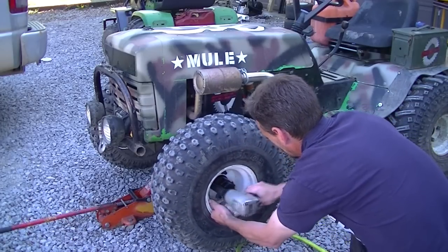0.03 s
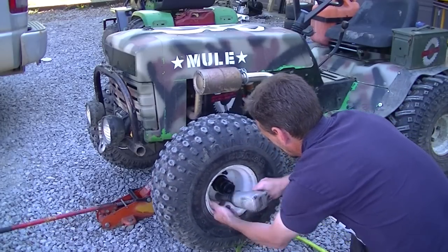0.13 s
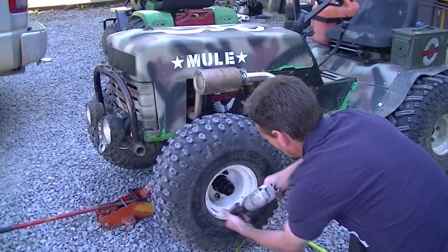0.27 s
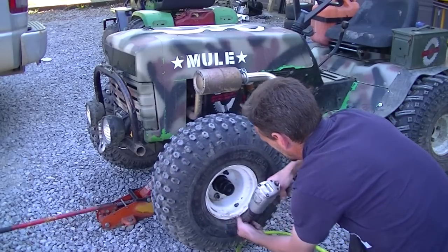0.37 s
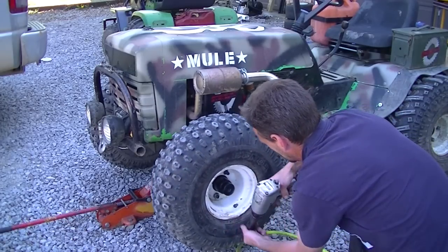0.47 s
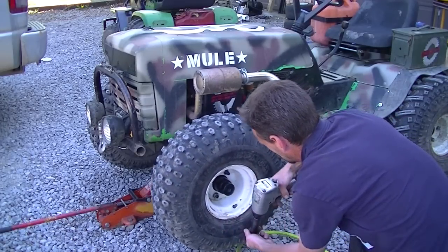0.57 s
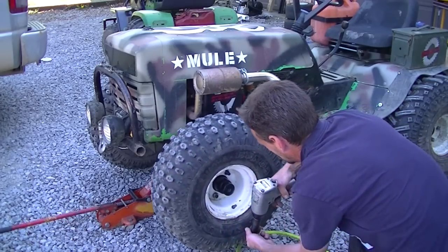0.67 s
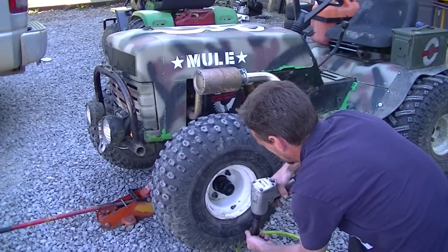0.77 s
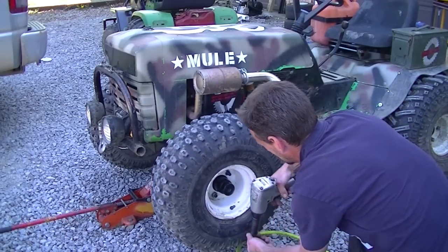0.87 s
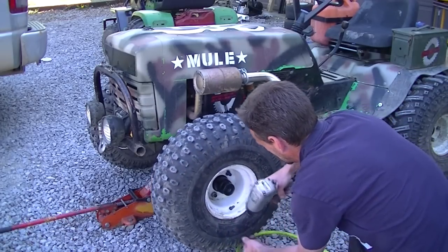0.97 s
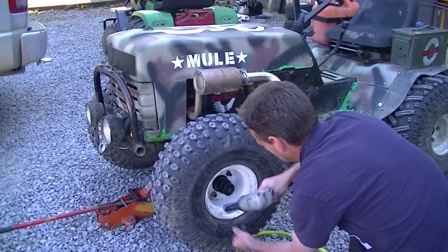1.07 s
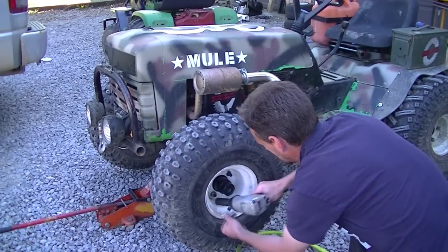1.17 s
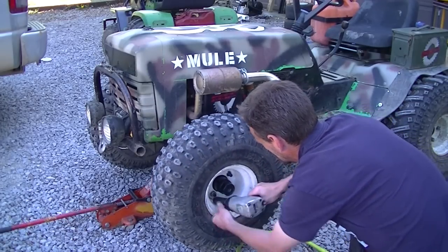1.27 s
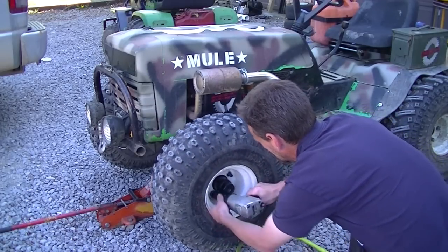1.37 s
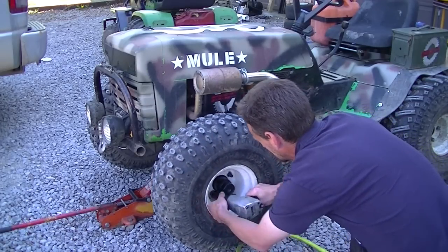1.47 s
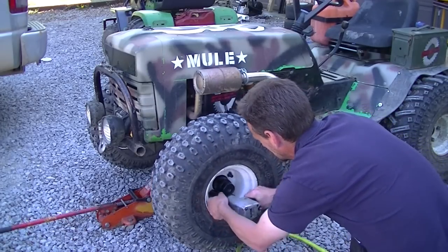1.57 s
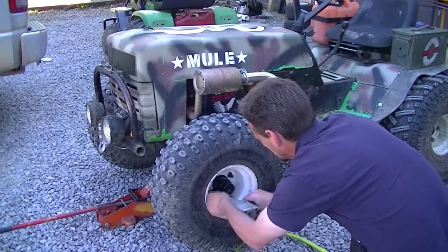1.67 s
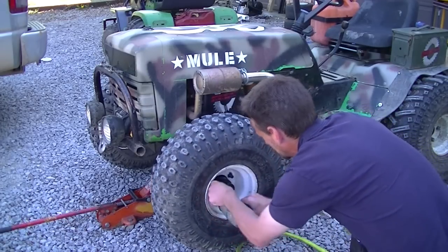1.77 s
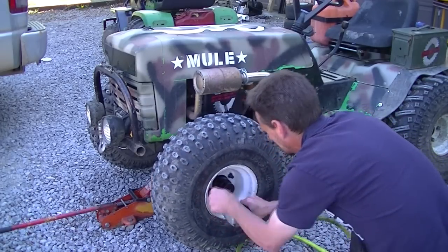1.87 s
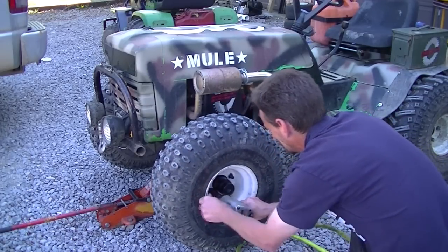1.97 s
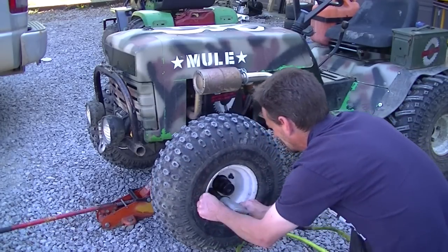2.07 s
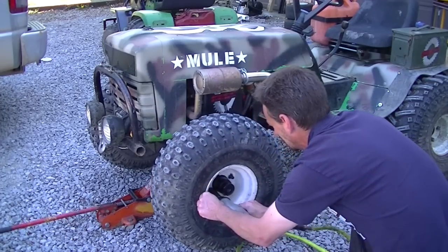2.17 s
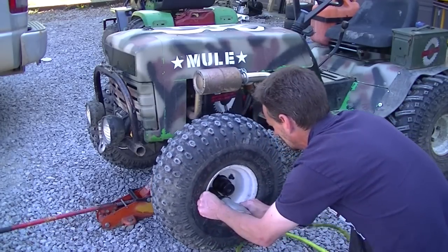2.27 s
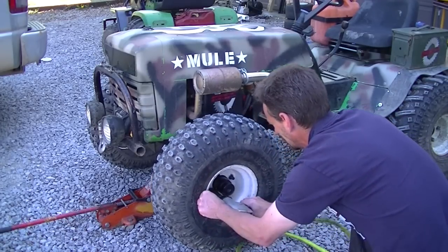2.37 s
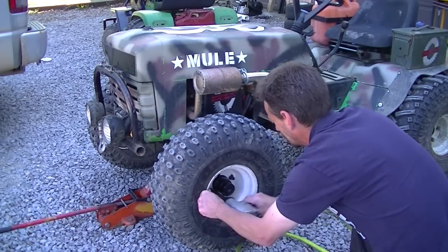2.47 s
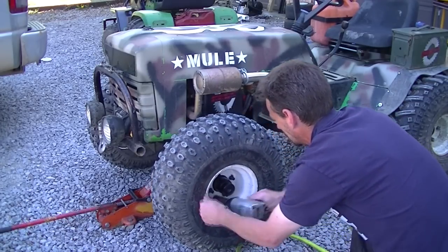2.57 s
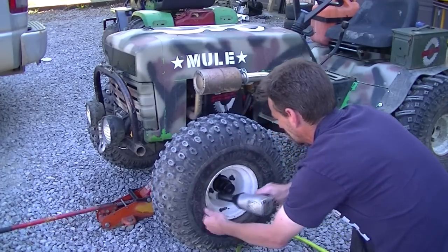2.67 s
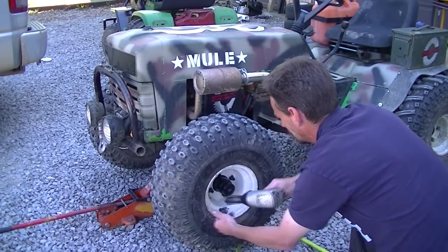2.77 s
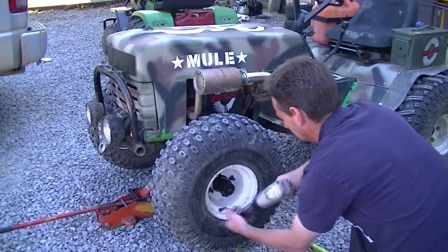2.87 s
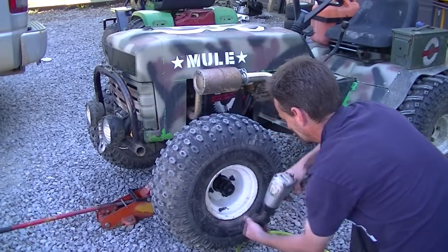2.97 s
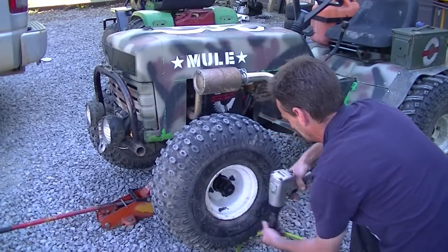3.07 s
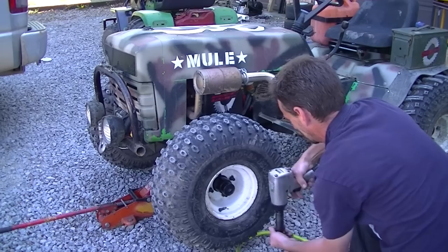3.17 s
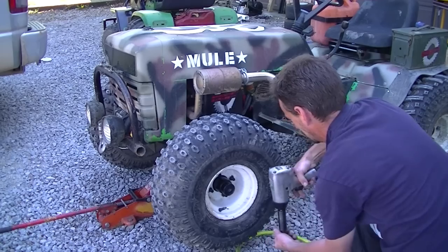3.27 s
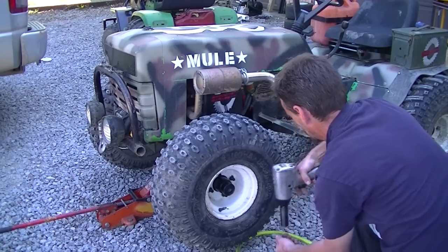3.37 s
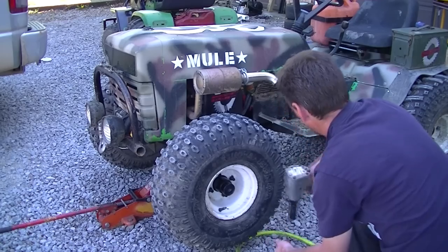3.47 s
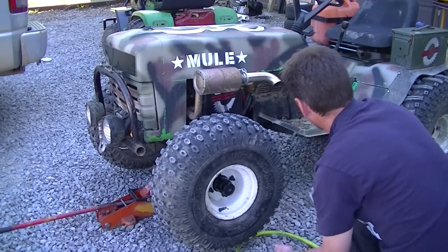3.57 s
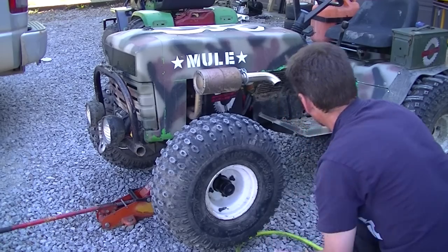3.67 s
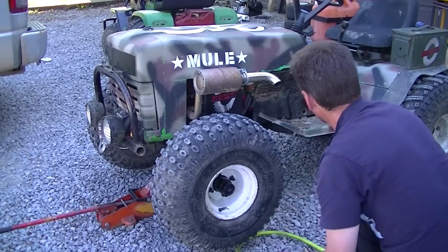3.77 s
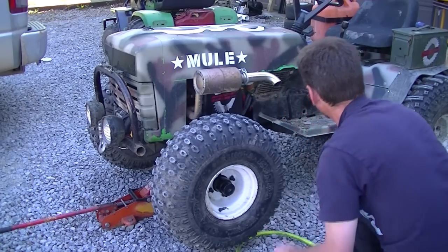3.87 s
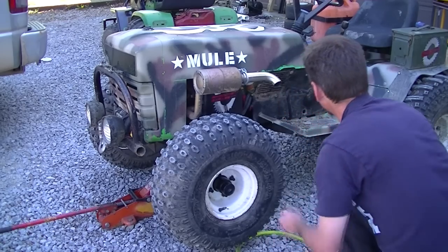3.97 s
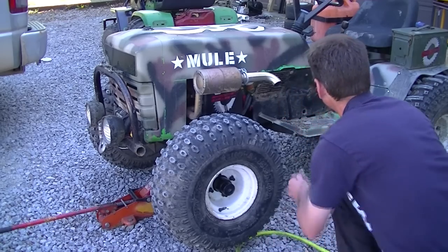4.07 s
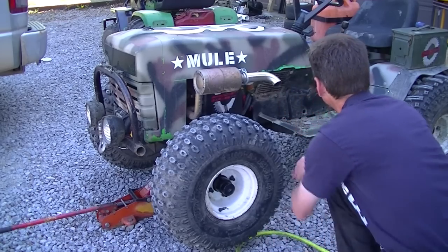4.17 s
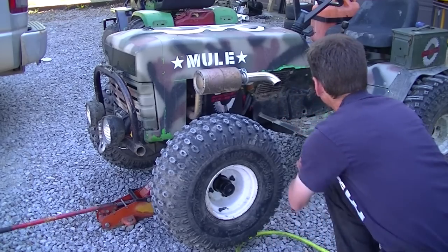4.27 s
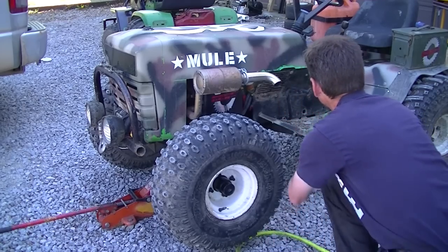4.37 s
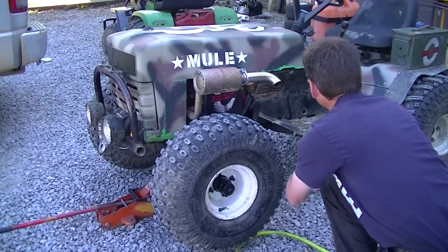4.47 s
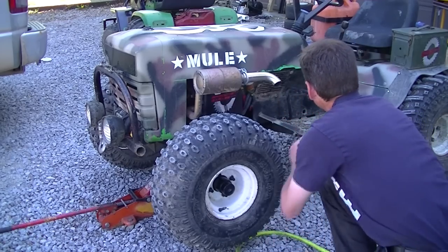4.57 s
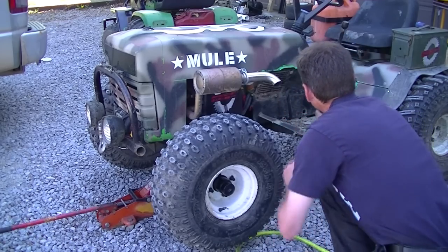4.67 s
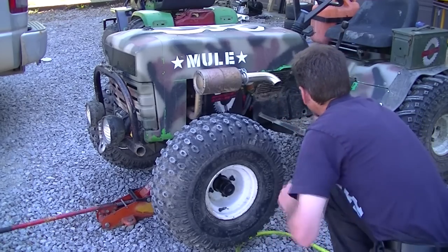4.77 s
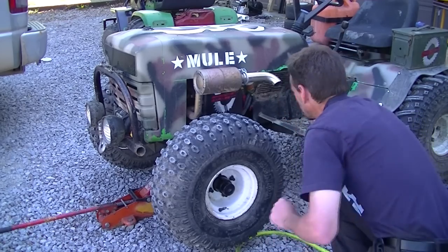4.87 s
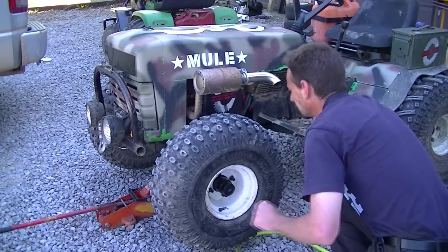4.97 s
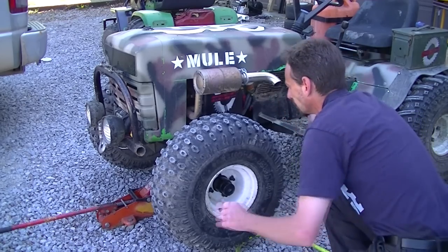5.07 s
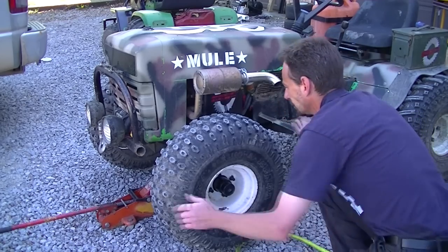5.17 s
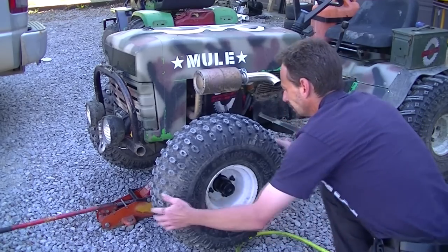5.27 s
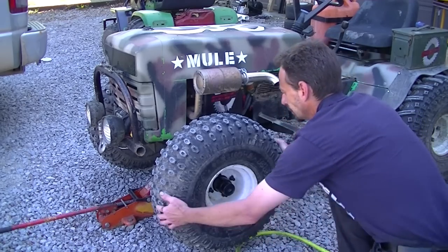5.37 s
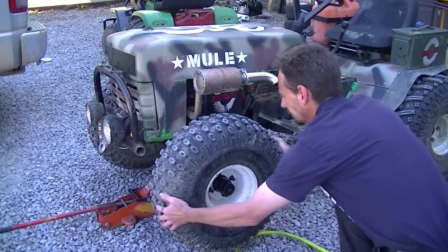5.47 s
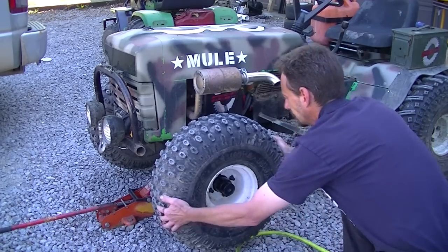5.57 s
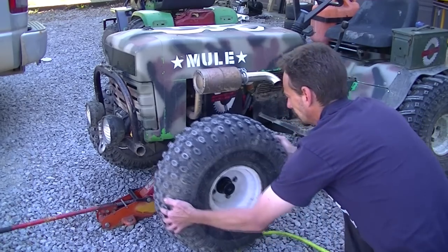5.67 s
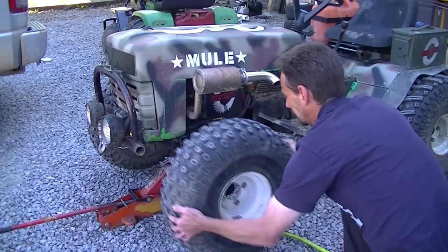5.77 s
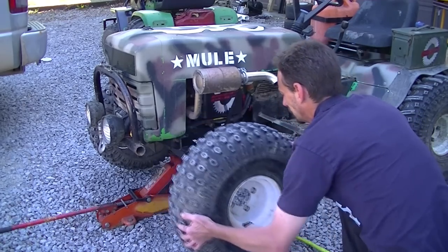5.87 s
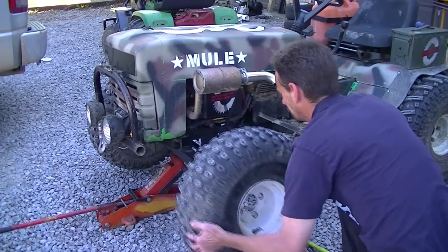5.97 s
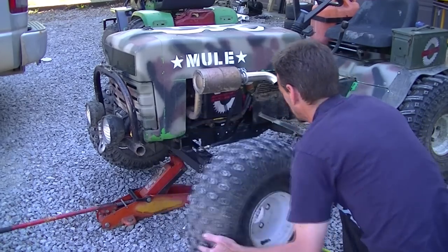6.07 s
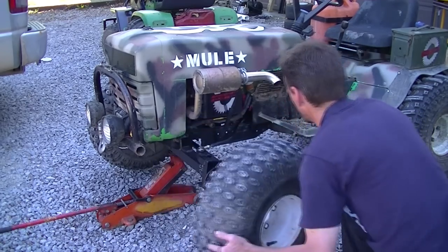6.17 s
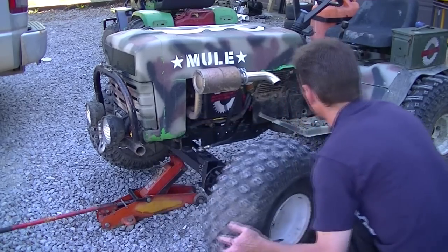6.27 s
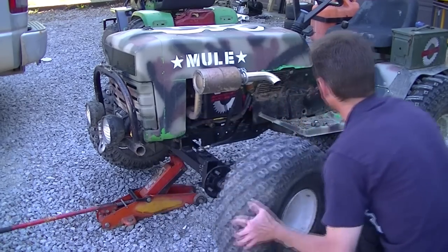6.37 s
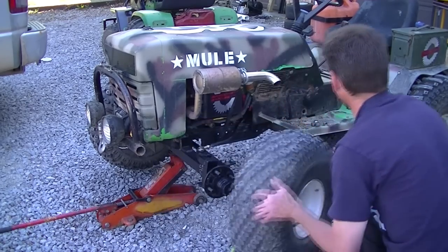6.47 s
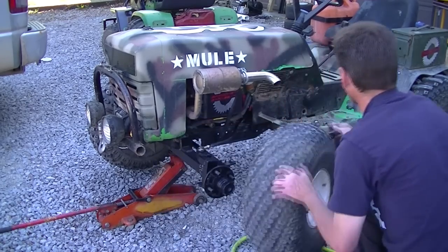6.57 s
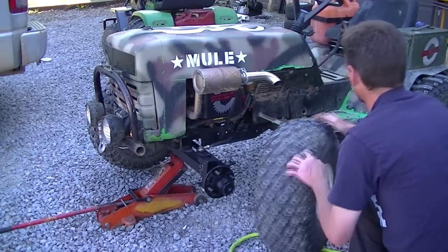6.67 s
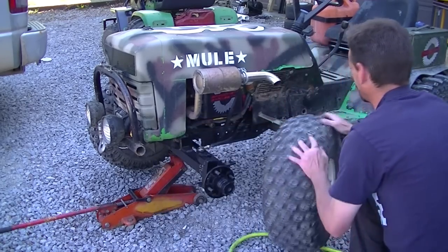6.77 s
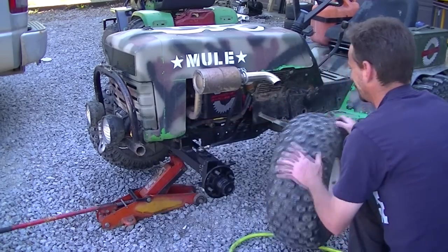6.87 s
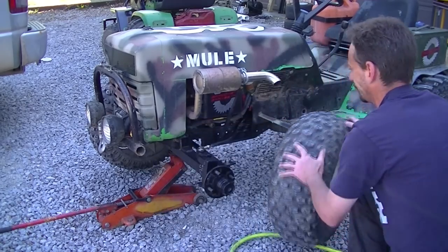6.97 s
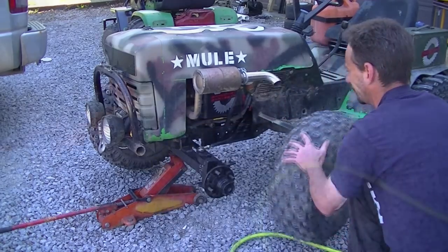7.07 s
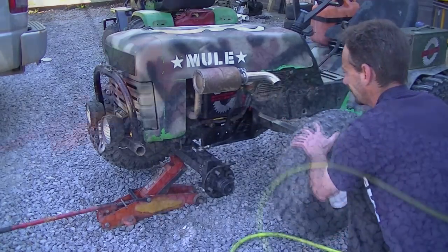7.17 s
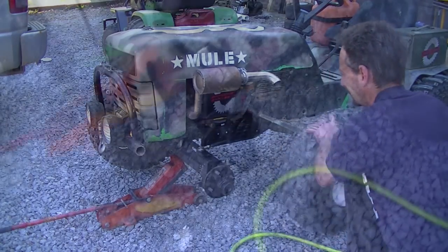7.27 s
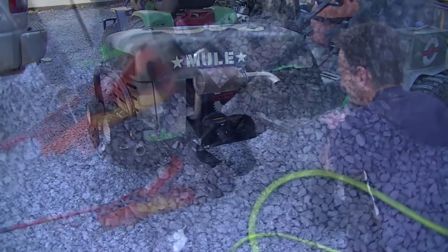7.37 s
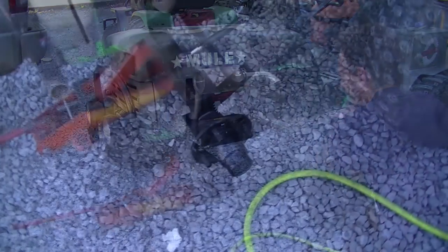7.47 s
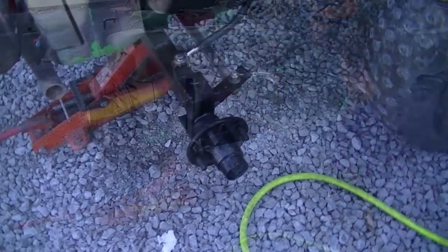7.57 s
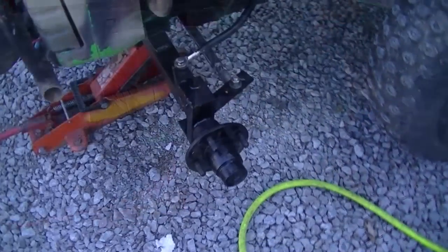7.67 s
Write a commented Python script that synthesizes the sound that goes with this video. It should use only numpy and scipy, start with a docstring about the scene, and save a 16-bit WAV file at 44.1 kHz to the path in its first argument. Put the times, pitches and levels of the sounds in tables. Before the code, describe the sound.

Close by in a gravel yard, an air wrench coasts down with a falling whine and metallic jingling while a bird whistles faintly. The socket knocks onto a nut, and the wrench hammers for half a second with a loud hiss, then rings and rattles as it slows. Knocks and crunching stones follow, a wheel scrapes off its studs, and the tyre thumps gently across the gravel. Light wind touches the microphone.

```python
"""An air impact wrench runs down, is fitted to a wheel nut, hammers briefly and runs down again.
Its vanes chop the air into pulses, its exhaust jet hisses and its blows ring the steel socket.
Tool and nuts knock on a gravel yard, the steel rim scrapes off the studs and the tyre rolls over
the stones. A bird whistles faintly; light wind touches the two microphone ports."""
import sys
import numpy as np
from scipy import signal
from scipy.io import wavfile
from scipy.ndimage import uniform_filter1d

SR = 44100
rng = np.random.default_rng(int(sys.argv[2]) if len(sys.argv) > 2 else 0)


def log_audio(samples):
    """Write samples as a 16-bit WAV file to the path given in sys.argv[1]."""
    # one column per channel
    frames = np.atleast_2d(samples).T
    # limit to full scale, then quantise
    limited = np.clip(frames, -1, 1)
    pcm = np.round(limited * 32767).astype(np.int16)
    wavfile.write(sys.argv[1], SR, pcm)


N = 340452
T = np.arange(N) / SR


def gain_of(db):
    """Decibels as an amplitude ratio."""
    return 10 ** (np.asarray(db) / 20)


def unit_rms(x):
    """Normalisation to unit mean power."""
    return x / np.sqrt(np.mean(x ** 2) + 1e-20)


def wander(samples, passes=1):
    """Slow random modulation: a moving average of white noise."""
    x = rng.standard_normal(N)
    for _ in range(passes):
        x = uniform_filter1d(x, samples)
    return unit_rms(x)


def level_at(spectrum, hz):
    """Interpolation of a spectrum, in dB, over log frequency."""
    points_hz, db = np.transpose(spectrum)
    return np.interp(np.log(hz + 1), np.log(points_hz + 1), db, -70, -70)


def coloured(x, spectrum):
    """Minimum-phase filter of unit noise gain, from rows of (frequency_hz, level_db)."""
    log_gain = np.log(gain_of(level_at(spectrum, abs(np.fft.fftfreq(8192, 1 / SR)))))
    taps = np.fft.ifft(np.exp(signal.hilbert(log_gain).conj())).real[:4096]
    return signal.oaconvolve(x, taps / np.linalg.norm(taps))[:N]


def resonate(x, modes):
    """Forced response of damped modes (pitch_hz, level_db, t60_s), at unit noise gain."""
    t = T[:round(SR * max(t60 for *_, t60 in modes))]
    taps = sum(gain_of(db - 60 * t / t60) * np.sin(2 * np.pi * hz * t) for hz, db, t60 in modes)
    return signal.oaconvolve(x, taps / np.linalg.norm(taps))[:N]


def bursts(start_s, level_db, t60_s):
    """Impact noise: fast attacks and exponential decays that add in power."""
    t, power = T[:SR // 3], np.zeros(N + SR)
    rise = 1 - np.exp(-t / .0004)
    for start, db, t60 in np.broadcast(start_s, level_db, t60_s):
        power[round(start * SR):][:len(t)] += (rise * gain_of(db - 60 * t / t60)) ** 2
    return np.sqrt(power[:N]) * rng.standard_normal(N)


def grains(per_s, spread_db):
    """Shot noise: sparse clicks of random sign, a few of them large."""
    size = gain_of(spread_db * np.minimum(rng.exponential(1, N), 4)) * rng.choice([-1, 1], N)
    return unit_rms(size * (rng.random(N) < per_s / SR))


def gate(start, end):
    """Trapezoidal envelope with 4 ms edges."""
    return np.clip(np.minimum(T - start, end - T) / .004, 0, 1)


def hump(start, length, rise_share):
    """Skewed half-sine envelope, peaking at rise_share of its length."""
    progress = np.clip((T - start) / length, 0, 1)
    skew = np.log(.5) / np.log(np.clip(rise_share, .05, .9))
    return abs(np.sin(np.pi * progress ** skew))


def rotor_speed(on, off, top_hz, air_drag, spin_up_s=.22, friction_per_s=1.4, push_s=.015):
    """Share of top speed: a first-order rise, then braking by bearing friction and quadratic drag."""
    driven_s, released_s = np.clip(T - on - .05, 1e-3, None), np.maximum(T - off, 0)
    rising = (1 - np.exp(-driven_s / spin_up_s)) / (1 - np.exp(-(off - on - .05) / spin_up_s))
    braked_s = released_s - push_s * (1 - np.exp(-released_s / push_s))  # trapped air pushes on
    drag_ratio = air_drag * top_hz / friction_per_s
    falling = 1 / ((1 + drag_ratio) * np.exp(friction_per_s * braked_s) - drag_ratio)
    return np.where(T < off, rising, falling)


# Exhaust response to the vane pulses: frequency_hz, level_db
EXHAUST_SPECTRUM = [(60, -24), (130, -18), (215, -9), (265, -20), (320, -28), (420, -20), (530, -14),
                    (660, -20), (800, -36), (1100, -19), (1500, -12), (1950, -26), (2550, -14), (3200, -30),
                    (6500, -45)]
def vane_pulses(on, off, vane_hz, cycles):
    """Siren principle: vanes chop the flow into harmonics of their passing frequency."""
    run = slice(max(round(on * SR), 0), round((off + 1.5) * SR))
    pulses = np.zeros(N)
    for k in range(1, 10):
        harmonic_db = level_at(EXHAUST_SPECTRUM, k * vane_hz[run]) - 3.3 * np.log2(k)
        pulses[run] += gain_of(harmonic_db) * np.cos(2 * np.pi * k * cycles[run] + k * k)
    level_db = .3 + 11.5 * np.minimum(np.log2(vane_hz / 449), 0)  # fades below 449 Hz
    level_db -= 19 * np.clip((off - T) / .0041, 0, 1)  # supply pressure mutes the pumping
    flutter_db = 2 * wander(500, passes=2)  # uneven vanes
    return gain_of(level_db + flutter_db) * pulses


# Rotor noise: frequency_hz, level_db
WHIRR_SPECTRUM = [(88, -58), (150, -18.5), (339, -11.5), (445, -9.5), (643, -30), (751, -17.5), (1350, -9),
                  (3480, -15), (3990, -10), (5440, -15), (9190, -14.5), (15500, -33.5)]
# Motor housing modes: pitch_hz, level_db, t60_s
HOUSING_MODES = [(4040, -8.5, 0.023), (4330, -0.5, 0.022), (4750, -2.5, 0.028), (2520, -1, 0.034)]
# Coasting whistles at a vane rate of 250 Hz: pitch_hz, level_db
WHINE_BANDS = [(4200, -7), (6900, -10), (8100, -10), (9400, -10)]
def rotor_whirr(on, off, vane_hz, puffs):
    """Forced vibration: puffs and vane ticks drive the housing; narrow noise bands sink with speed."""
    ticks = np.diff(np.floor(np.cumsum(vane_hz) / SR), prepend=0)
    ticks *= np.sqrt(SR / np.maximum(vane_hz, 20))
    rush = coloured(puffs + .47 * (ticks - ticks.mean()), WHIRR_SPECTRUM)
    housing = .34 * resonate(.35 * puffs + .9 * ticks, HOUSING_MODES)
    phase_per_hz = 2 * np.pi * np.cumsum((vane_hz / 250) ** .08) / SR
    whine = sum(gain_of(db) * wander(SR // 220, passes=2) * np.sin(hz * phase_per_hz)
                for hz, db in WHINE_BANDS)
    level_db = -25.5 + 9.7 * np.minimum(np.log2(vane_hz / 306), 0) - 4 * (T < off)
    return gain_of(level_db) * ((T > on) * (rush + housing) + (T > off) * whine)


# Exhaust jet noise: frequency_hz, level_db
JET_SPECTRUM = [(100, -41), (200, -56), (400, -19), (800, -25), (1200, -12), (2700, -2.5), (3600, -11.5),
                (4200, 4), (4800, 6), (5350, -7.5), (6400, 4.5), (8000, -3), (9600, 1.5), (11600, -13.5),
                (13500, -8), (15600, -18.5)]
# Hollow tool case modes: pitch_hz, level_db, t60_s
CASE_MODES = [(2550, -3.5, 0.0036), (4780, 4.5, 0.0075), (5810, 9, 0.015), (6160, 8, 0.0075),
              (8380, 3.5, 0.0068), (9300, 5, 0.0096), (10330, 7, 0.014)]
def exhaust_jet(on, off, level_db, puffs, t60_s=.084):
    """Turbulent jet hiss, with a bright case resonance that is high-passed at 900 Hz."""
    opening = np.clip((T - on) / .0034, 0, 1) ** 2
    valve = opening * gain_of(level_db - 60 * np.maximum(T - off, 0) / t60_s)
    jet = gain_of(wander(250)) * unit_rms(puffs)
    case = signal.lfilter(*signal.butter(2, 900, "high", fs=SR), resonate(jet, CASE_MODES))
    return valve * (coloured(jet, JET_SPECTRUM) + .45 * case)


# Trigger pulls: on_s, off_s, jet_db, top_vane_hz, air_drag_per_pulse
TRIGGER_PULLS = [(-.9, .04, -14, 580, .0066), (1.955, 2.453, -13.5, 600, .0075)]
def air_motor(on, off, jet_db, top_hz, air_drag):
    """Expanding air spins a vane rotor, which modulates the flow with one puff a vane."""
    speed = rotor_speed(on, off, top_hz, air_drag)
    vane_hz = top_hz * speed
    cycles = np.cumsum(vane_hz * (1 + .016 * wander(300))) / SR
    puff_shape = (.5 + np.exp(-(cycles % 1) / .3)) / .85
    puffs = puff_shape * (rng.standard_normal(N) + .2 * grains(900, 5))
    octave = gain_of(-26) * speed ** 2 * np.sin(4 * np.pi * np.cumsum(vane_hz) / SR)
    noise = rotor_whirr(on, off, vane_hz, puffs) + exhaust_jet(on, off, jet_db, puffs)
    return noise + vane_pulses(on, off, vane_hz, cycles) + gate(on + .2, off + .01) * octave


# Outdoor background: frequency_hz, level_db
YARD_SPECTRUM = [(65, 12), (110, 1), (188, -1.5), (459, -6.5), (577, -6), (1350, -11.5), (6510, -19),
                 (15500, -26.5)]
def yard():
    """Stationary ambient noise, strongest in the bass."""
    return gain_of(-53) * coloured(rng.standard_normal(N), YARD_SPECTRUM)


# Low buffeting: frequency_hz, level_db
BUFFET_SPECTRUM = [(15, 1.5), (40, -14.5), (90, -11.5), (140, -16), (300, -27)]
# Wind gusts, and a deep tyre thump at 6.4 s: centre_s, half_width_s, level_db
LOW_SWELLS = [(4.15, 0.17, -54), (4.8, 0.16, -49.5), (5.05, 0.1, -46.5), (6.425, 0.072, -44),
              (6.56, 0.19, -52)]
def buffeting():
    """Low pressure fluctuations from wind and one tyre thump, weakly correlated at the two ports."""
    both, left, right = (coloured(rng.standard_normal(N), BUFFET_SPECTRUM) for _ in range(3))
    swells = sum(gain_of(db) * np.exp(-((T - at) / width) ** 2) for at, width, db in LOW_SWELLS)
    return (gain_of(-63) + swells) * (.5 * both + np.array([.85 * left, 1.05 * right]))


# The free socket clacking on its anvil: start_s, level_db
FREE_CLACKS = [(0.073, -4.5), (0.328, -17), (0.4277, -17), (0.6501, -27), (0.778, -19), (0.807, -28),
               (0.842, -29.5), (0.865, -24), (0.884, -33), (0.899, -33), (0.95, -36), (0.9983, -38),
               (1.009, -36), (1.0218, -28.5), (1.073, -38), (1.0921, -30), (1.159, -32), (1.1904, -37),
               (1.234, -33), (1.281, -26), (1.3502, -28), (1.3725, -31), (1.402, -28), (2.4973, -6.5),
               (2.51, -1.5), (2.525, 6), (2.536, -1), (2.557, 3), (2.588, -2.5), (2.6257, -1),
               (2.639, -4.5), (2.939, -14), (2.9567, -15), (2.9748, -18), (2.994, -17.5), (3.0537, -21),
               (3.1398, -18.5), (3.1772, -28), (3.1969, -15.5), (3.312, -31.5), (3.37, -29.5)]
# Hammer blows while the nut holds: start_s, level_db
HAMMER_BLOWS = [(1.9606, -3.5), (1.9913, -5), (2.0116, 8.5), (2.0356, 4), (2.0635, 1), (2.091, -9),
                (2.1133, 6), (2.1443, -1.5), (2.2074, 1.5), (2.296, -16)]
# Hard contact noise: frequency_hz, level_db
TICK_SPECTRUM = [(1290, -37), (2200, -3.5), (3560, -4), (4160, 0.5), (6270, -3.5), (8010, -5.5),
                 (9350, -7.5), (10100, -8), (11800, -19.5), (15500, -31)]
# Steel socket modes: pitch_hz, level_db, t60_s
SOCKET_MODES = [(2140, -15, 0.12), (4900, 17.5, 0.0044), (6200, -4, 0.023), (6580, -0.5, 0.039),
                (8900, 1, 0.048), (10500, -6.5, 0.077)]
def socket_impacts():
    """Impact excitation: each hit cracks and rings the socket; harder hits carry more midrange."""
    start_s, db = np.transpose(HAMMER_BLOWS + FREE_CLACKS)
    ring = gain_of(-8) * resonate(bursts(start_s, db, .022), SOCKET_MODES)
    crack = gain_of(-4) * coloured(bursts(start_s, 1.07 * db, .018), TICK_SPECTRUM)
    mid_db = 1.4 * db + np.repeat([-17, -14.5], [len(HAMMER_BLOWS), len(FREE_CLACKS)])
    mid_spectrum = [(300, -36.5), (600, -5), (1200, -5), (2400, -8.5), (3000, -2), (4500, -42)]
    return crack + ring + coloured(bursts(start_s, mid_db, .04), mid_spectrum)


# Spells of loose jingling: start_s, end_s, level_db
SOCKET_SHAKES = [(0.296, 1.438, -31.5), (1.277, 1.452, -41.5), (2.64, 3.75, -28)]
def socket_chatter(modes_hz=(6210, 6560, 6650), settle_db_per_s=18.5):
    """Intermittent contact: in fits and after hits, each light touch excites one of three close modes."""
    shaking = sum(np.sqrt(hump(start, end - start, .091)) * gain_of(db - settle_db_per_s * (T - start))
                  for start, end, db in SOCKET_SHAKES)
    fits = shaking * gain_of(2.7 * wander(1500))
    start_s, db = np.transpose(HAMMER_BLOWS + FREE_CLACKS)
    after_hits = abs(bursts(start_s, np.minimum(db, -24), .07))
    envelope = gain_of(-7) * (fits + after_hits)
    return sum(resonate(envelope * grains(220, 3.2), [(hz, 0, .016)]) for hz in modes_hz)


# Square hits that excite the socket's highest mode: start_s, level_db
SQUARE_HITS = [(0.328, -30), (0.7791, -47), (1.4431, -52), (2.5104, -20), (2.536, -24), (2.559, -11.5),
               (2.5915, -32), (2.628, -27), (2.9577, -36), (2.996, -36.5), (3.1602, -43), (3.975, -24)]
# Side hits that excite its lower modes: start_s, pitch_hz, level_db, t60_s
SIDE_HITS = [(2.625, 2206, -1.5, 0.027), (2.626, 8630, -19.5, .2), (2.638, 3950, -24, 0.43)]
def socket_ringing(ping_hz=12930, beat_hz=130, ping_t60_s=.19):
    """Free vibration: a close pair of modes beats, its neighbours die fast, lower modes ring singly."""
    out, t = np.zeros(N + SR), T[:SR // 2]
    attack = np.minimum(t / .0026, 1)
    for start, db in SQUARE_HITS:
        pair = np.sin(2 * np.pi * ping_hz * t)
        pair += .7 * np.sin(2 * np.pi * (ping_hz + beat_hz) * t + 6 * rng.random())
        neighbours = np.sin(2 * np.pi * (ping_hz + rng.uniform(-450, 450, (4, 1))) * t).sum(0)
        ping = pair + .7 * gain_of(-60 * t / .07) * neighbours
        out[round(start * SR):][:len(t)] += attack * gain_of(db - 60 * t / ping_t60_s) * ping
    for start, hz, db, t60 in SIDE_HITS:
        out[round(start * SR):][:len(t)] += gain_of(db - 60 * t / t60) * np.sin(2 * np.pi * hz * t)
    return out[:N]


# Bird calls: start_s, length_s, from_hz, towards_hz, level_db
BIRD_CALLS = [(.865, .07, 3700, 2900, -47), (1.14, .27, 2650, 3950, -47), (1.47, .045, 3700, 2600, -40),
              (1.675, .085, 3750, 2450, -43)]
def bird(start, length, from_hz, towards_hz, db):
    """A whistle with an exponential glide, made raspy by random amplitude modulation."""
    glide = np.exp(-np.clip(T - start, 0, length) / (.4 * length))
    hz = towards_hz + (from_hz - towards_hz) * glide
    rasp = .75 + .6 * wander(90)
    return hump(start, length, .37) * rasp * gain_of(db) * np.sin(2 * np.pi * np.cumsum(hz) / SR)


# Knocks of tool, nuts, rim and stones; the last row is a sharp click as the sound ends:
# start_s, level_db, mid_offset_db, bass_offset_db, base_t60_s
IMPACTS = [(1.4422, -10.5, -12, -20.5, 0.058), (1.4995, -22, 1.5, -8, 0.035),
           (1.507, -13, -16, -15.5, 0.058), (1.5636, -30.5, -25, -26, 0.27),
           (1.601, -11.5, -8.5, -13, 0.028), (1.637, -23, -18, -20, 0.028),
           (1.6506, -17.5, -36, -9.5, 0.025), (1.659, -9.5, -14.5, -20, 0.018), (1.783, -28, 3, -25, 0.029),
           (1.795, -2, -13, -7.5, 0.03), (1.818, -31, -13, -19, 0.027), (3.547, -28, -22, -40, 0.032),
           (3.897, -39, -27, -35, 0.034), (3.9578, -13, -26, -30, 0.055), (3.9615, -5, -26, -29.5, 0.11),
           (4.115, -23.5, -45, -31, 0.026), (4.134, -24.5, -43, -27, 0.042), (4.194, -24, -48, -36, 0.15),
           (4.271, -28.5, -44, -45, 0.15), (4.38, -29, -20, -38, 0.041), (4.4046, -25.5, -25, -44, 0.043),
           (4.8793, -15, -1, -1.5, 0.097), (5.1985, -47, 3, 14, 0.094), (5.318, -41, 1.5, 5, 0.11),
           (5.424, -29, -22, -22.5, 0.13), (5.4589, -21.5, -12, -12.5, 0.018),
           (5.521, -20, -20.5, -25, 0.025), (5.686, -37.5, -4, 3, 0.24), (6.1082, -27, -21, -10.5, 0.23),
           (6.1254, -11, -20, -18.5, 0.049), (6.1464, -5, -19.5, -25, 0.025),
           (6.2488, -19, -9.5, -18, 0.012), (6.2583, -19, -33, -21, 0.0084),
           (6.702, -34.5, -18, -12.5, 0.47), (6.925, -38, -6, -1.5, 0.05), (6.978, -33.5, -12, -4.5, 0.03),
           (7.4585, -35, -8, -18, 0.041), (7.7098, -23.5, -18, -17, 0.13)]
# Tyre and rim modes: pitch_hz, level_db, t60_s
WHEEL_MODES = [(215.5, 0, 0.13), (461, -17, 0.16), (702, 0, 0.043), (1156, 1, 0.04), (1454, -4.5, 0.047)]
def knocks():
    """Impact sound: a bright contact tick over the duller response of wheel and ground."""
    start_s, db, mid_offset_db, bass_offset_db, t60 = np.transpose(IMPACTS)
    contact = bursts(start_s, db + 4.5, .0046)
    contact += bursts(start_s, db - 2.5, .5 * t60) + bursts(start_s, db - 8.5, 1.79 * t60)
    tick = gain_of(-5) * coloured(contact, TICK_SPECTRUM) + gain_of(-19) * resonate(contact, CASE_MODES)
    mid = bursts(start_s, db + mid_offset_db, .97 * t60)
    bass = bursts(start_s, db + bass_offset_db, 1.43 * t60)
    wheel = gain_of(-6) * resonate(mid, [mode for mode in WHEEL_MODES if mode[0] > 800])
    wheel += gain_of(-4) * resonate(bass, [mode for mode in WHEEL_MODES if mode[0] <= 800])
    rap = coloured(mid, [(700, -24), (1100, 5.5), (1800, -1.5), (2600, -13.5), (4500, -46)])
    thud = coloured(bass, [(70, -47), (120, -9.5), (200, -6), (300, -2), (700, -10.5),
                           (1000, -16.5), (1600, -40)])
    return tick + wheel + gain_of(6.5) * rap + gain_of(5) * thud


# Stones shifting under knees and tyre: start_s, length_s, level_db, rise_share
STONE_SHIFTS = [(3.522, 0.25, -50.5, 0.4), (3.866, 0.51, -43, 0.26), (4.363, 0.14, -62, 0.69),
                (4.608, 0.55, -51, 0.72), (5.822, 0.089, -47, 0.45), (6.128, 0.99, -47.5, 0.43),
                (7.106, 0.46, -53.5, 0.5), (7.5, 0.51, -52.5, 0.57)]
# One stone on another: frequency_hz, level_db
CLICK_SPECTRUM = [(1200, -25), (2500, 1), (4000, 1.5), (7000, 4), (10000, -8), (15500, -24)]
# Dense crunching: frequency_hz, level_db
CRUNCH_SPECTRUM = [(530, -7), (900, 2.5), (1480, 3.5), (1690, -1), (2150, 1), (2480, -2.5), (6740, -2.5),
                   (15500, -20)]
def gravel():
    """Granular noise: stones under load collide in clumps."""
    floor = gain_of(-63) * gate(STONE_SHIFTS[0][0], T[-1] + 1)
    shifts = sum(gain_of(db) * hump(start, length, rise) for start, length, db, rise in STONE_SHIFTS)
    clumps = gain_of(3 * wander(900))
    clicks = coloured(unit_rms(clumps * grains(400, 4.4)), CLICK_SPECTRUM)
    crunch = coloured(unit_rms(clumps * rng.standard_normal(N)), CRUNCH_SPECTRUM)
    return (floor + shifts) * (.72 * clicks + .7 * crunch)


def hollow_hum(start_s=4.885, pitch_hz=468, level_db=-35, t60_s=.45):
    """Damped resonance: something hollow hums after one knock."""
    age = np.maximum(T - start_s, 0)
    return gain_of(level_db - 60 * age / t60_s) * np.sin(2 * np.pi * pitch_hz * age)


# Steel rim modes: pitch_hz, level_db, t60_s
RIM_MODES = [(1720, 9, 0.042), (2024, 12, 0.13), (3040, 5, 0.09), (3025, -3, 0.6), (4520, 8, 0.03),
             (5965, -12, 0.22), (6530, -9, 0.1), (8100, -11, 0.056)]
def rim_scrape(catch_s=5.672, release_s=5.742, free_s=6.08):
    """Stick-slip friction: the rim catches on the stud threads, lets go and rings on."""
    since_release = T - release_s
    build_db = np.maximum(287 * since_release, -16)
    fall_db = np.maximum(-595 * since_release, -21.5 - 60 * since_release)  # a drop, then light rubbing
    level_db = np.where(T < release_s, build_db, fall_db)
    slips = gate(catch_s, free_s) * grains(1200, 2.5)
    steel = gain_of(-21 + 1.8 * level_db) * slips * gate(catch_s, release_s + .07)
    thud_spectrum = [(70, -38), (120, -3), (300, 7.5), (600, 4), (1050, -1), (1500, -22)]
    thud = coloured(gain_of(level_db - 15.5) * slips, thud_spectrum)
    grit = gain_of(-9.5) * coloured(steel, CRUNCH_SPECTRUM)
    return thud + grit + gain_of(8) * resonate(steel, RIM_MODES)


# Rubber rubbing stones: start_s, end_s, level_db, modes (pitch_hz, level_db, t60_s)
TYRE_DRAG = (6.21, 6.66, -44, [(1140, 14, 0.0051), (1480, -1, 0.031), (1960, 0, 0.02)])
# Tread blocks meeting the ground: start_s, level_db
TREAD_THUMPS = [(6.445, -41.5), (6.479, -44), (6.566, -40), (6.605, -41), (6.71, -49), (6.754, -37),
                (6.851, -38), (6.923, -43), (6.97, -41.5), (7.153, -42), (7.322, -42), (7.378, -44),
                (7.525, -43), (7.67, -39)]
# Rolling rumble: frequency_hz, level_db
RUMBLE_SPECTRUM = [(200, -9), (330, -9), (470, -0.5), (650, -11), (1300, -21), (1800, -31)]
def tyre(thump_s=.057):
    """Sliding friction, then rolling contact: the tyre drags and thumps along on its tread."""
    start, end, drag_db, modes = TYRE_DRAG
    drag = gain_of(drag_db) * np.sqrt(hump(start, end - start, .69))
    thumps = sum(gain_of(db) * hump(at, thump_s, .12) for at, db in TREAD_THUMPS)
    noise = rng.standard_normal(N)
    return resonate(drag * noise, modes) + coloured(thumps * noise, RUMBLE_SPECTRUM)


def echoes(x, t60_s=.34):
    """Reverberation: sparse reflections from ground, vehicle and walls form a short dull tail."""
    t = T[:SR // 3]
    reflections = rng.standard_normal(len(t)) * (rng.random(len(t)) < .06) * (t > .004)
    tail = signal.lfilter([1], [1, -.8], reflections * gain_of(-60 * t / t60_s))
    return signal.oaconvolve(x, tail / np.linalg.norm(tail))[:N]


def scene():
    """Superposition of near sources, their echoes and the background at two nearly coherent ports."""
    near = sum(air_motor(*pull) for pull in TRIGGER_PULLS)
    near += socket_impacts() + socket_ringing() + socket_chatter()
    near += knocks() + hollow_hum() + rim_scrape() + gravel() + tyre()
    far = sum(bird(*call) for call in BIRD_CALLS) + yard()
    centre = near + gain_of(-16) * echoes(near) + far
    scatter = rng.standard_normal(400) / 20
    side = gain_of(-34) * signal.oaconvolve(centre, scatter)[:N]
    return np.array([centre + side, centre - side]) + buffeting()


def record(dry, threshold_db=-10.5, recovery_db_per_s=270, cutoff_hz=15690):
    """Dynamic range compression ducks the sound after loud blows; peaks clip; a low-pass follows."""
    power_db = 10 * np.log10(abs(uniform_filter1d((dry ** 2).mean(0), 130)) + 1e-12)
    recovery_db = T * recovery_db_per_s
    held_db = np.maximum.accumulate(power_db + recovery_db) - recovery_db
    over_db = np.maximum(held_db - threshold_db, 0)
    duck_db = .5 * signal.lfilter([.01], [1, -.99], over_db)
    clipped = np.clip(dry / gain_of(duck_db), -1.3, 1.3)
    low_pass = signal.firwin(511, cutoff_hz, window=("kaiser", 9), fs=SR)
    return np.clip(signal.oaconvolve(clipped, low_pass[None], "same"), -1, 1)


dry = scene()
out = record(dry)
log_audio(out)
```